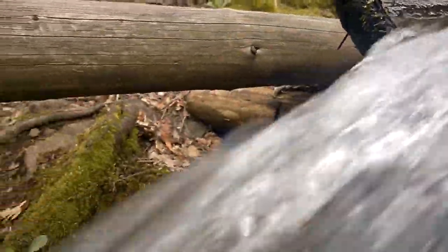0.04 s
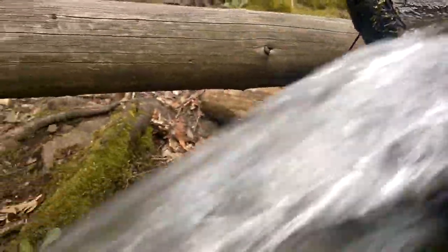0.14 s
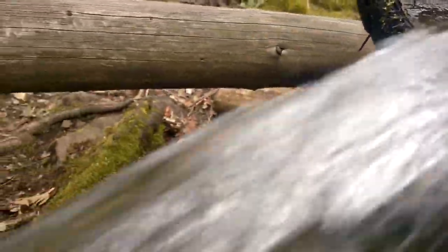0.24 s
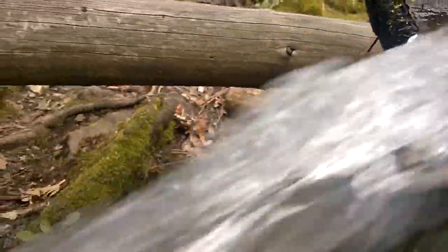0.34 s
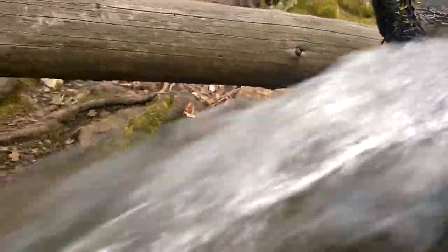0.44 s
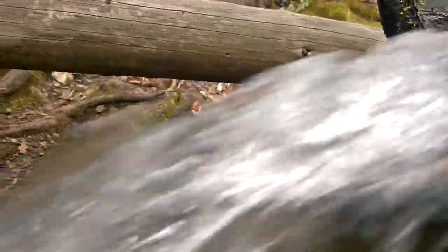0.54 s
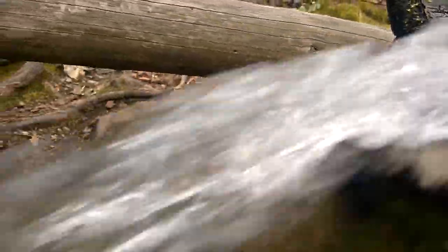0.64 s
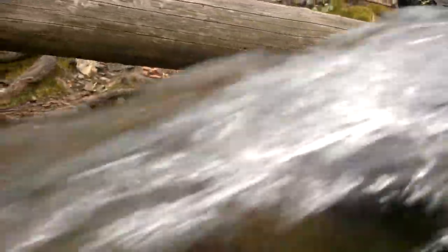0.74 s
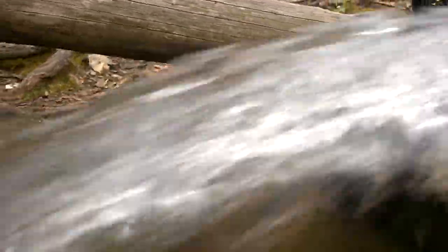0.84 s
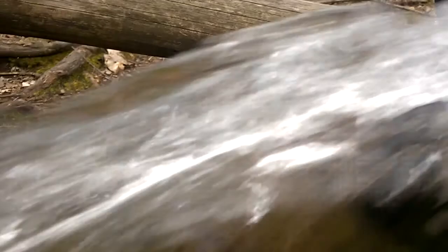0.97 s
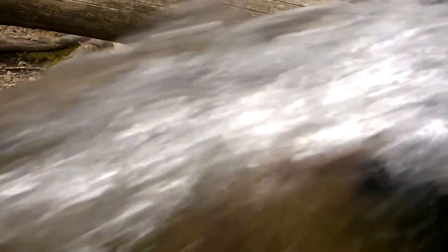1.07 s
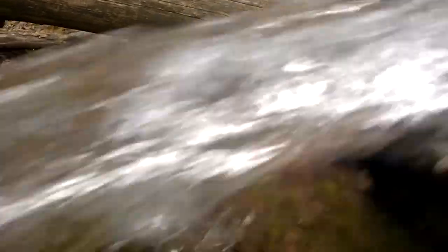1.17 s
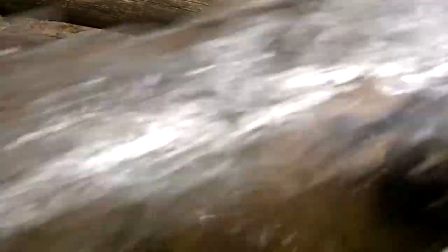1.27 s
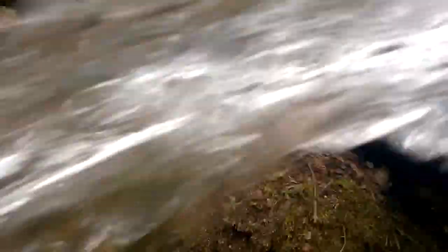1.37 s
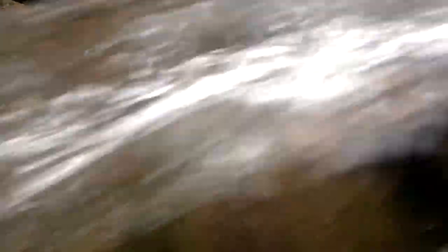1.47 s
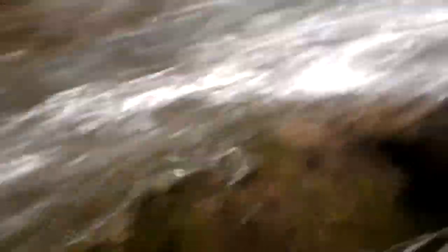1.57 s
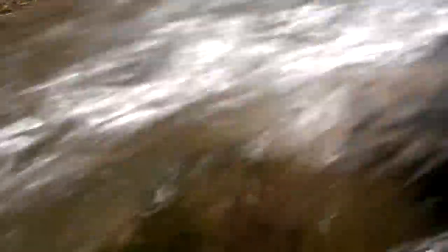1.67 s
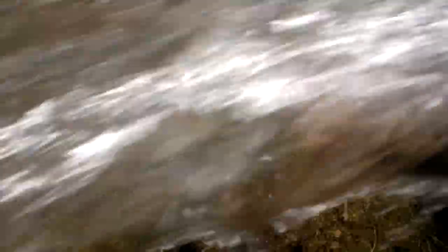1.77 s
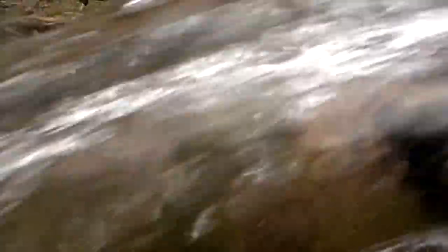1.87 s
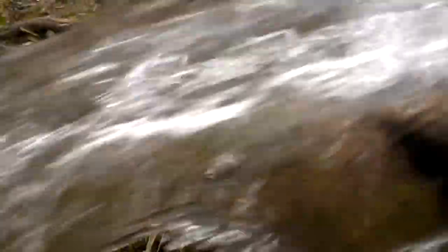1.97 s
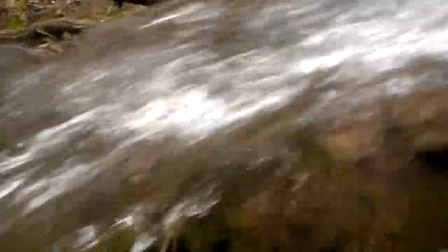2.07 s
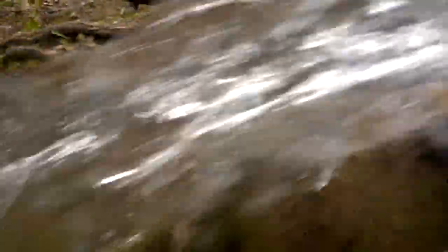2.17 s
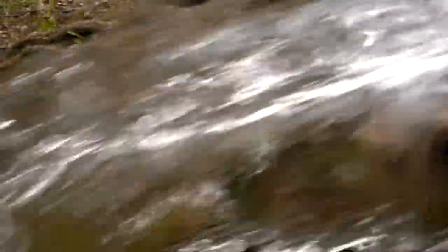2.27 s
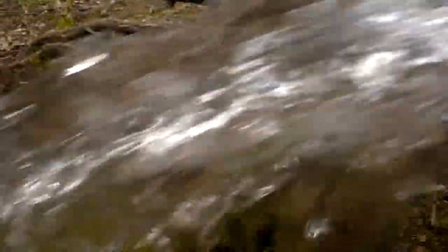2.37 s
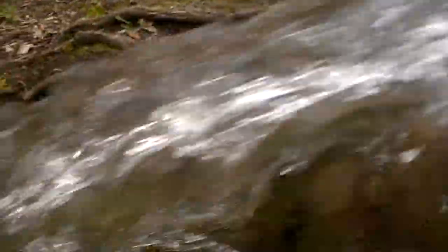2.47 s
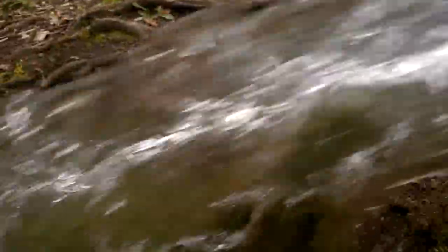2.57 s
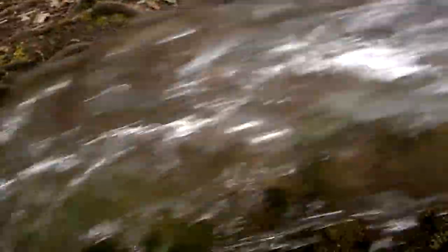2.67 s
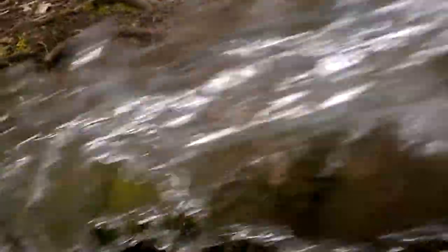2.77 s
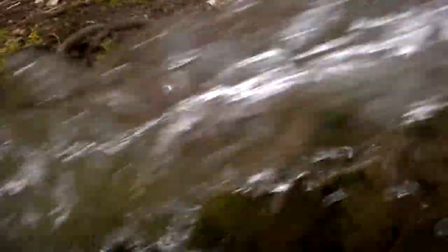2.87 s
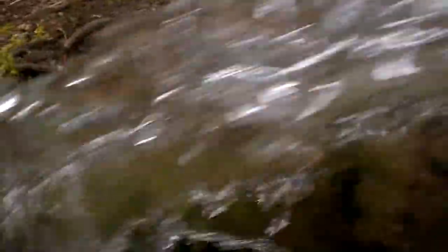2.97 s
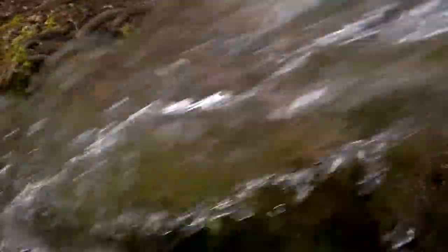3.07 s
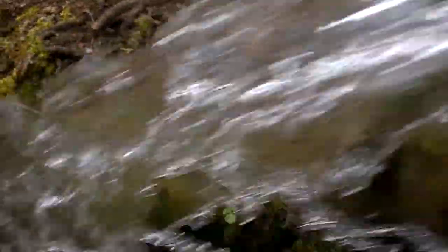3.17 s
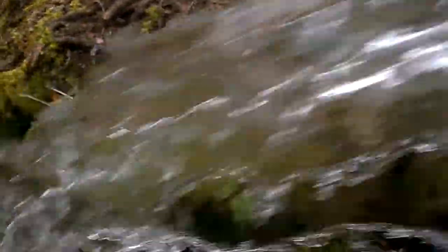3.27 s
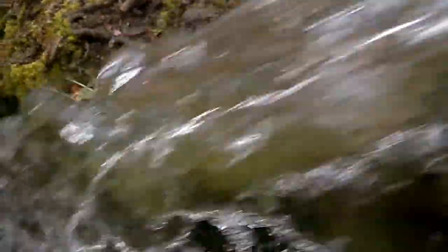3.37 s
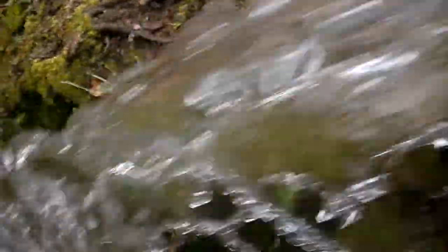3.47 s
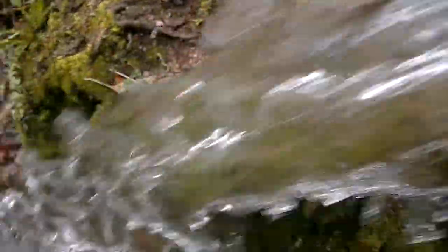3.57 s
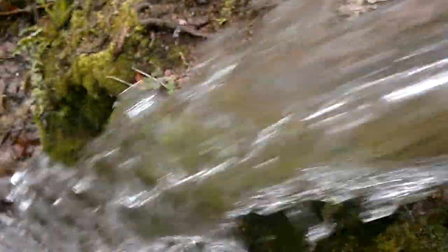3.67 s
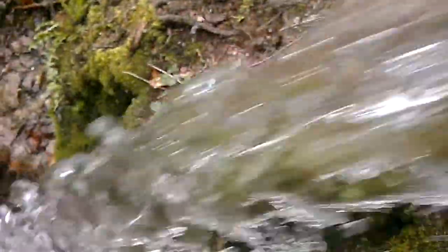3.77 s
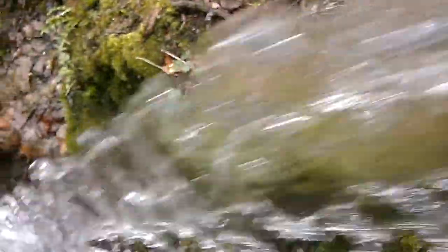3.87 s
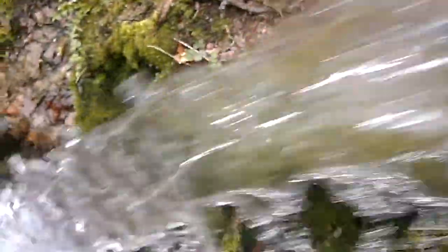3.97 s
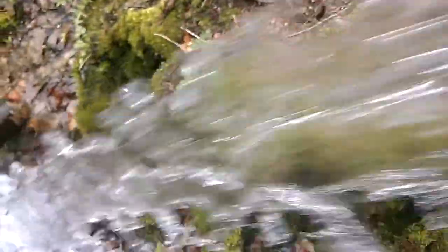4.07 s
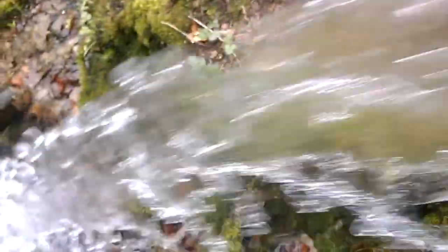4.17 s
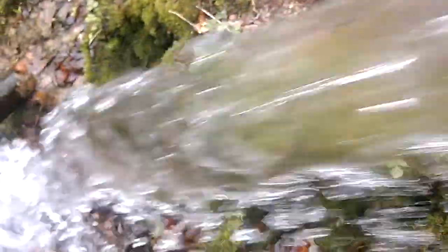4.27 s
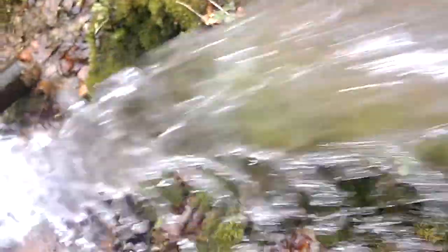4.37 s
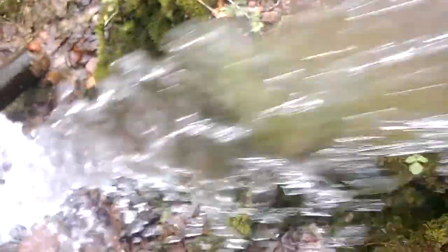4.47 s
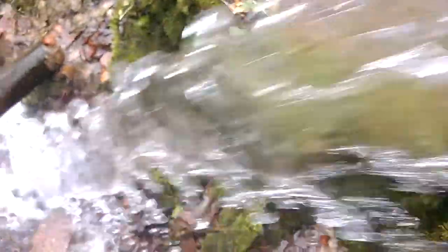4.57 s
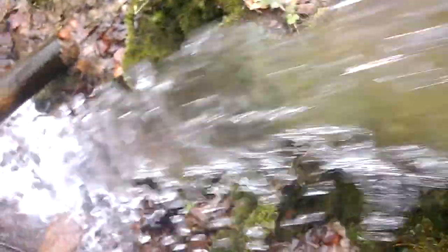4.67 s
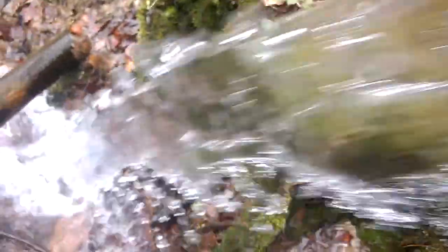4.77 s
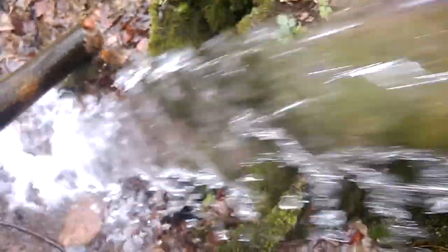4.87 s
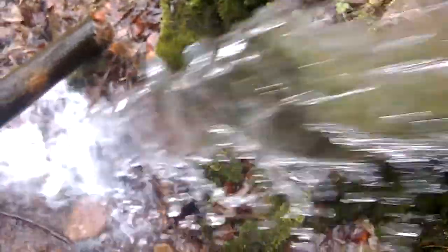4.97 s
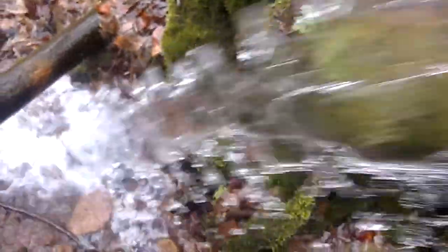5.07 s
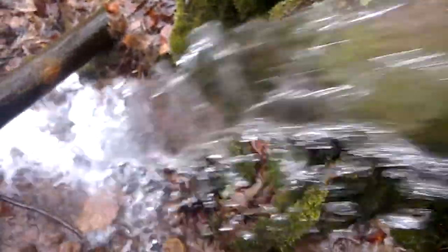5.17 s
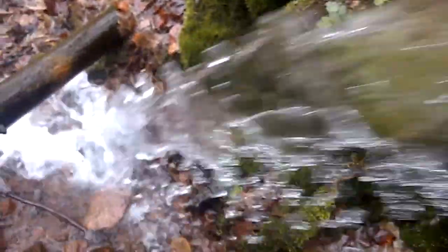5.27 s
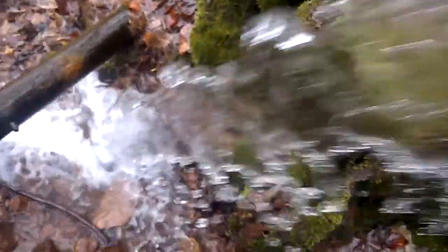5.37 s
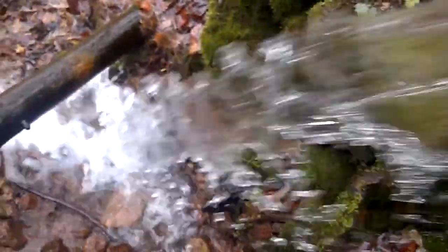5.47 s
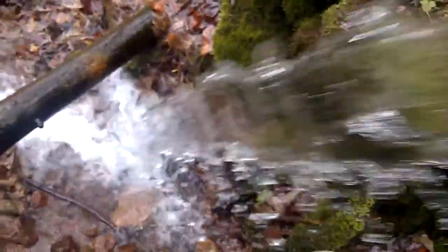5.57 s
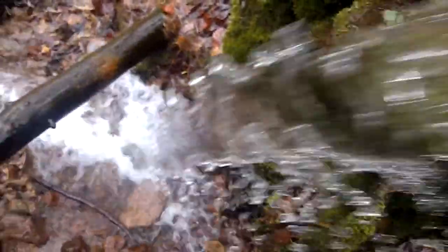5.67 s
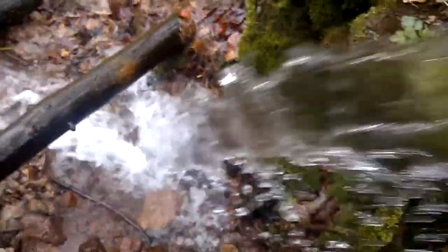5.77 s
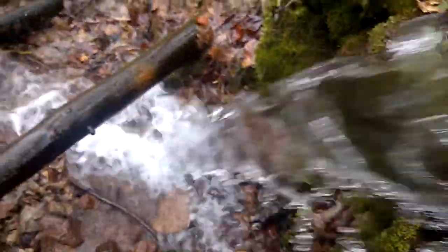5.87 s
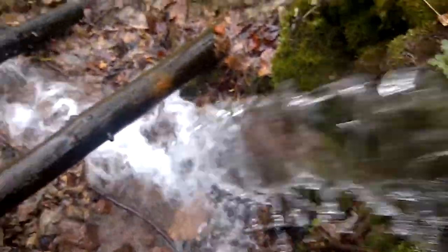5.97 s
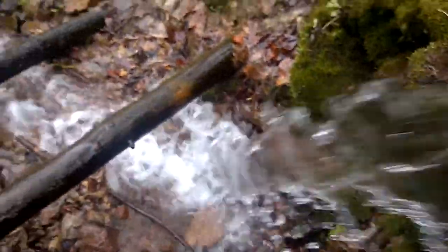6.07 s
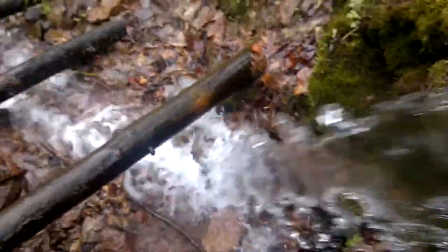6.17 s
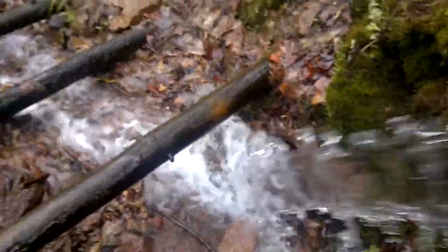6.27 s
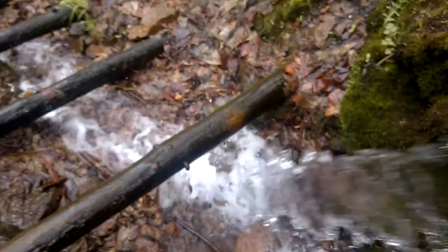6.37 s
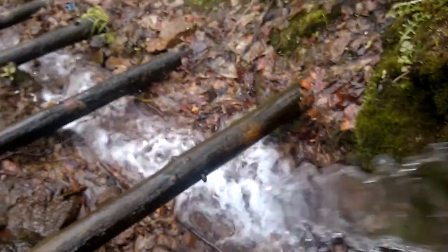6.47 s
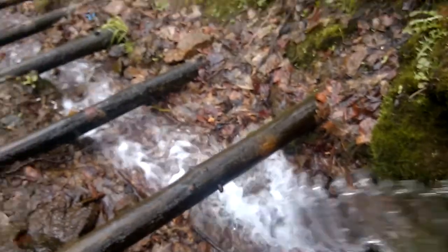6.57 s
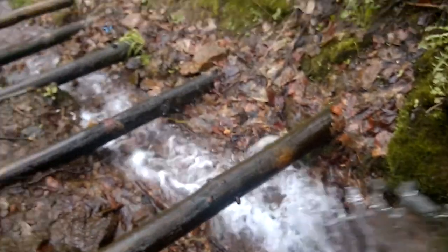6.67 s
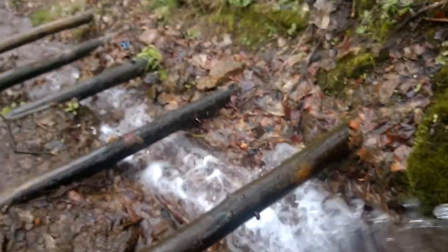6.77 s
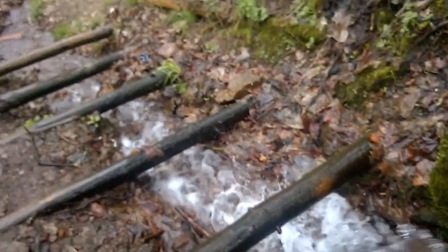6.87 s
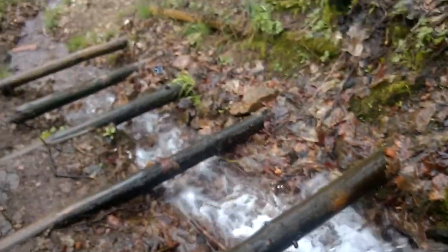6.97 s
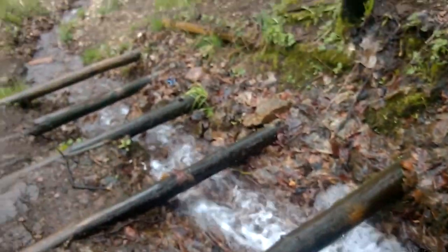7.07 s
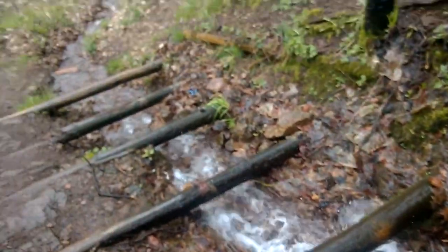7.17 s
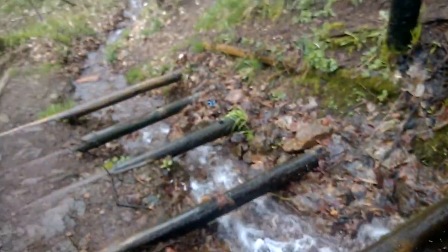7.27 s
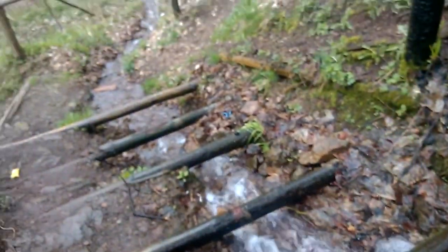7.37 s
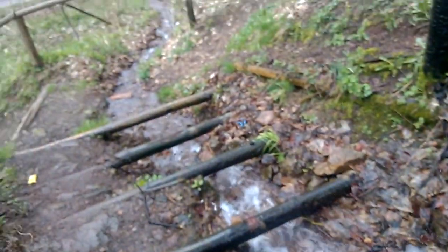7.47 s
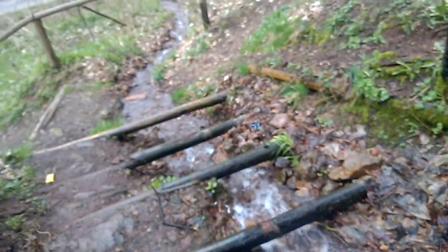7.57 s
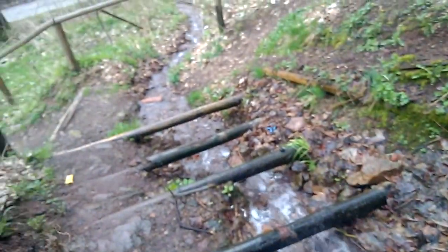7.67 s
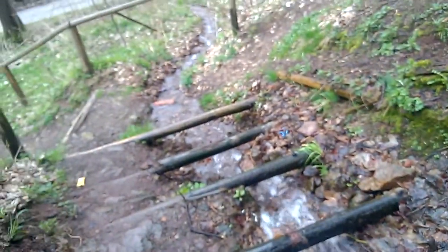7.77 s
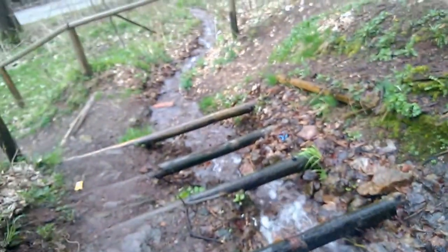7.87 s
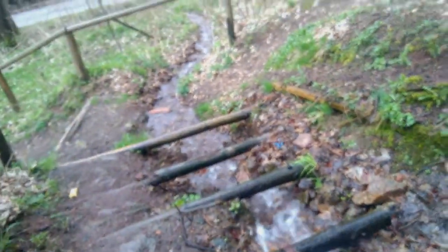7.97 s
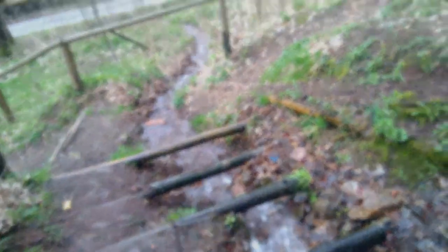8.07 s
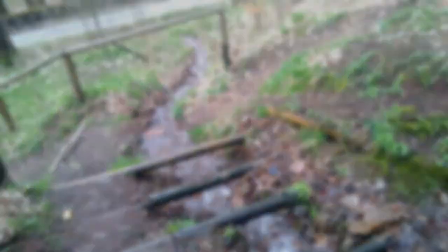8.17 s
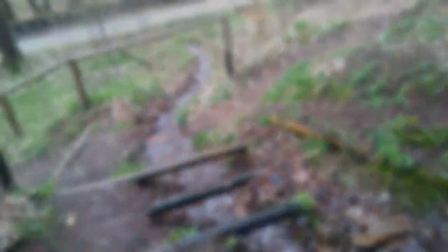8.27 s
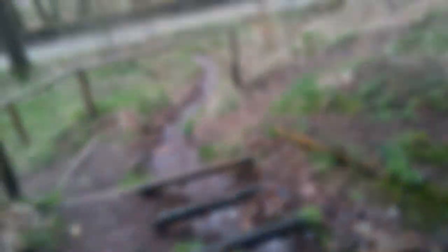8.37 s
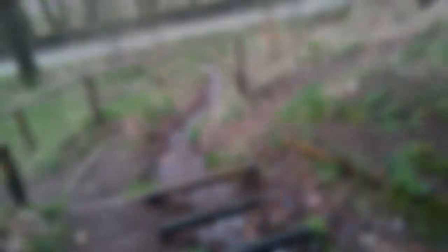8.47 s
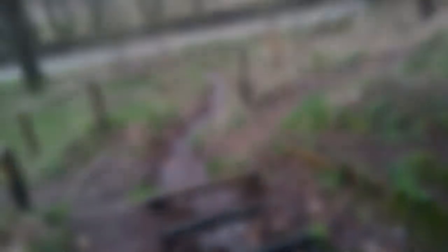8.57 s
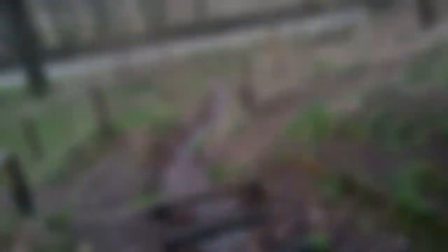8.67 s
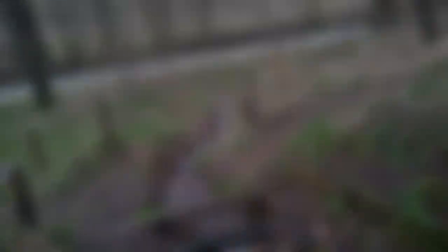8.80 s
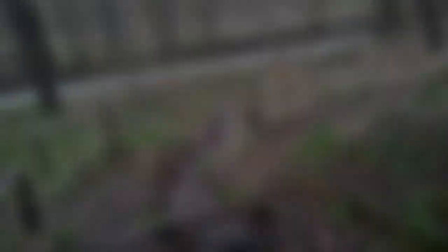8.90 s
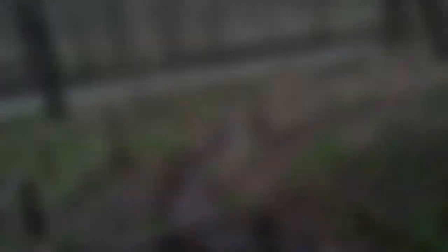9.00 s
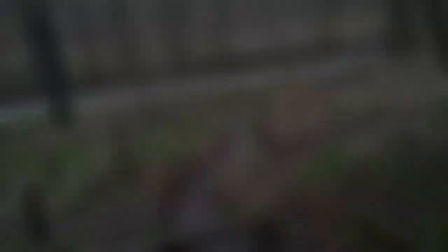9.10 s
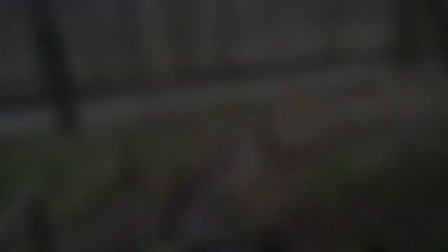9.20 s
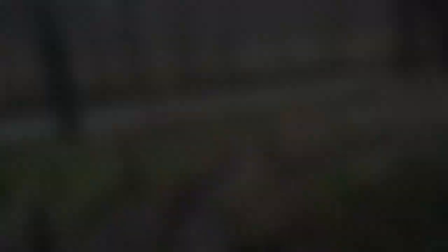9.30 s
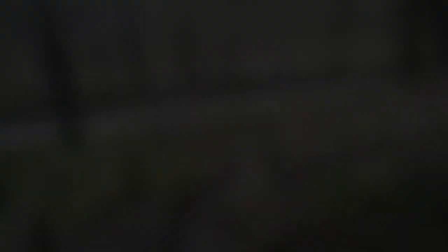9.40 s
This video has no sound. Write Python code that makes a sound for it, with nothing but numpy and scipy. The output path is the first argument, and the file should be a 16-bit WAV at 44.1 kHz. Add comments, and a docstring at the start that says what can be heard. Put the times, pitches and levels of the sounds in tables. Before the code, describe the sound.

Continuous rushing water, dense and noisy, with fine crackling drops and spray. Small gushes and slaps stand out, clustering around the middle, followed by many short, rising bubble plops. Soft low thuds and churning lie far beneath. The close handheld outdoor microphone moves from jet to pool to shallow run; the hiss shifts in colour, then the sound thins and fades to silence.

```python
"""Forest pipe falling into a stream

Water gushes from a pipe: splashes are noise bursts, bubbles are short rising sines, drops are clicks.
Slaps of water are hollow smacks with spray; single bubbles plop and glug; churn and soft thuds rumble below.
Colour and level follow a microphone from the jet down to the foaming pool, then away downstream to a fade."""
import sys
import numpy as np
from scipy import signal
from scipy.fft import rfft, irfft
from scipy.io import wavfile
from scipy.ndimage import uniform_filter1d

SR = 44100
rng = np.random.default_rng(int(sys.argv[2]) if len(sys.argv) > 2 else 0)


def output_pcm(signal):
    """Save a mono or channel-first signal as 16-bit PCM at the path in sys.argv[1].

    Samples are clipped to [-1, 1] before scaling.
    """
    pcm = np.clip(np.atleast_2d(signal).T, -1, 1) * 32767
    wavfile.write(sys.argv[1], SR, np.round(pcm).astype(np.int16))


N = 416294
TIME = np.arange(N) / SR  # s
BINS_HZ = np.fft.rfftfreq(N, 1 / SR)


def amp(db):
    """Decibels to gain."""
    return 10 ** (np.asarray(db) / 20)


def evened(x):
    """Scales to rms 1."""
    return x / np.sqrt(np.mean(x ** 2) + 1e-20)


def bell(x, centre, width):
    """A smooth bump of height 1."""
    return np.exp(-((x - centre) / width) ** 2)


def read(points, hz):
    """Reads a spectrum in dB on a log-frequency axis."""
    f, db = np.transpose(points)
    return np.interp(np.log(hz + 1), np.log(f + 1), db)


def read_columns(table, t):
    """Interpolates every column after the first at t, the first being time."""
    s, *columns = np.transpose(table)
    return [np.interp(t, s, column) for column in columns]


def add(mix, s, sound):
    """Mixes a sound in at time s."""
    part = mix[max(round(s * SR), 0):][:len(sound)]
    part += sound[:len(part)]


def noise(gain):
    """Noise of rms 1 with the given gain on each frequency."""
    return evened(irfft(rfft(rng.standard_normal(N)) * gain, N))


def burst(envelope, gain):
    """Noise under an envelope, then coloured by the given gain on each frequency."""
    return irfft(rfft(envelope * noise(1)) * evened(gain), N)


def wander(hz):
    """Random curve of rms 1 that swings about hz times a second."""
    return noise(BINS_HZ / (BINS_HZ + hz / 2) / (1 + (BINS_HZ / hz) ** 4))


def impacts(per_s, spread_db, cap):
    """Random clicks, their dB exponentially distributed up to cap spreads."""
    return (rng.random(N) < per_s / SR) * amp(spread_db * np.minimum(rng.exponential(1, N), cap))


def dying(x, seconds):
    """Gives every click an exponential tail of unit area."""
    r = np.exp(-1 / (seconds * SR))
    return signal.lfilter([1 - r], [1, -r], x)


def bubble(hz, cycles, rise=0.015, snap=2):
    """A trapped bubble swells for a few cycles and dies, its pitch rising as it nears the surface."""
    turns = np.arange(int(6 * cycles * SR / hz)) * hz / SR
    age = turns / cycles  # 1 at the peak
    swell = (age * np.exp(1 - age)) ** snap
    return swell * np.sin(2 * np.pi * turns * (1 + rise * age))


def splashes(surge, per_s=280, spread_db=2.0, cap=3.0, colour_db=4.5, spatter=0.98):
    """Each slug of water cracks, then spatters; it reaches all bands, each by its own amount."""
    crack_s, spatter_s = .0016, .012
    slugs = impacts(per_s, spread_db, cap) * surge
    at = np.flatnonzero(slugs)
    octaves = np.log2(np.geomspace(300, 14000, num=7))
    out = np.zeros(N)
    for pick in np.eye(len(octaves)):
        share = np.interp(np.log2(BINS_HZ + 1), octaves, pick)
        band_db = colour_db * np.clip(rng.standard_normal(N)[at], -2, 2)
        energy = np.zeros(N)
        energy[at] = (slugs[at] * amp(band_db)) ** 2
        power = dying(energy, crack_s) + spatter * dying(energy, spatter_s)
        out += np.sqrt(share.mean()) * evened(noise(np.sqrt(share)) * np.sqrt(power))
    return evened(out)


def foam(surge, per_s, spread_db, cycles, cap=3.04, top_hz=13000, count=44):
    """Bubbles of all sizes; the small, high ones are the most frequent."""
    out = np.zeros(N)
    for hz in np.geomspace(230, 15000, count):
        births = impacts(per_s * (hz / 1000) ** .6, spread_db, cap) * surge
        ring = bubble(hz * rng.uniform(0.99, 1.01), cycles * 2 ** rng.uniform(-1.1, 0.78))
        level = np.sqrt(hz / (1 + (hz / top_hz) ** 4))
        out += level * evened(signal.oaconvolve(births, ring)[:N])
    return evened(out)


def blips(per_s=200, spread_db=2.5, cap=5.1, cycles=5.2, low_hz=400, high_hz=5500):
    """Single bubbles at the calm edge of the pool ring longer; small ones last more cycles."""
    out = np.zeros(N)
    for when, size, pitch, length in rng.random((int(per_s * N / SR), 4)):
        hz = low_hz * (high_hz / low_hz) ** np.sqrt(pitch)
        db = spread_db * min(-np.log(1 - size), cap)
        ring = bubble(hz, cycles * np.sqrt(hz / 1000) * 2 ** (length - .5), rise=0.0047)
        add(out, when * N / SR, amp(db) * np.sqrt(hz) * ring)
    return evened(out)


def clusters(per_s=26, spread_db=1.9, life_s=0.005, cycles=2.55, low_hz=450, high_hz=5000, count=7):
    """A collapsing air pocket breaks into a handful of bubbles within milliseconds: a wet knock."""
    out = np.zeros(N)
    for row in rng.random((int(per_s * N / SR), count + 1, 2)):
        (when, size), bubbles = row[0], row[1:]
        db = spread_db * min(-np.log(1 - size), np.pi)
        for delay, pitch in bubbles:
            hz = low_hz * (high_hz / low_hz) ** pitch
            start_s = when * N / SR - life_s * np.log(1 - delay)
            add(out, start_s, amp(db) * hz * bubble(hz, cycles))
    return evened(out)


def drops(per_s=130, spread_db=-1.0, cap=4.7):
    """Flung drops tick on wet stone and leaves, each a single sharp click."""
    return evened(impacts(per_s, spread_db, cap) * rng.choice([-1, 1], N))


def steady(x):
    """The pipe gives a constant flow, so a burst of splashes is followed by a lull."""
    power = uniform_filter1d(x ** 2, int(.075 * SR))
    return evened(x / np.sqrt(abs(power) + 1e-12))


def pockets(x, depth_db=1.5, width_hz=80, life_s=0.12, top_hz=2600):
    """Air pockets form and collapse under the fall: narrow, mostly low bands lift and sink for a moment."""
    hz, t, z = signal.stft(x, SR, nperseg=2048, noverlap=1536)
    patches = rng.standard_normal((len(t), len(hz))).T
    for axis, steps in enumerate([width_hz / hz[1], life_s / t[1]]):
        kernel = np.exp(-(2 * np.arange(-40, 41) / steps) ** 2)
        patches = signal.fftconvolve(patches, np.expand_dims(kernel, 1 - axis), "same", axes=axis)
    lift_db = depth_db * evened(patches) / (1 + (hz[:, None] / top_hz) ** 2)
    return signal.istft(z * amp(lift_db), SR, nperseg=2048, noverlap=1536)[1][:N]


# Heavier gushes from the pipe. Each row: centre in seconds, swell in dB.
GUSHES = [(0.022, 3.5), (0.11, 2), (0.305, 1.5), (1.04, 0), (1.08, 2), (2.81, 2), (3.56, -0.5), (4.84, 1),
          (6.49, 2), (7.18, 0.5), (8.419, 1.5)]
GUSH_HALF_S = 0.036


def heavier(x, top_hz=5000):
    """Heavy gushes swell the gurgle and splash, but hardly the fine spray."""
    swell = amp(sum(db * bell(TIME, s, GUSH_HALF_S) for s, db in GUSHES)) - 1
    return x + swell * irfft(rfft(x) / (1 + (BINS_HZ / top_hz) ** 4), N)


LULL_DEPTH, LULL_LEAD_S, LULL_HALF_S = 0.28, 0.0065, 0.0033  # depth 0-1


def parted(x):
    """The jet parts for an instant just before each near slug lands: a brief dip in level."""
    gaps = sum(bell(TIME, s - LULL_LEAD_S, LULL_HALF_S) for s, *_ in SLAPS)
    return x * (1 - LULL_DEPTH * np.minimum(gaps, 1))


# Path of the microphone. Each row: time in seconds, splash in relative dB, gurgle in relative dB,
# place (0 jet, 1 fall, 2 pool, 3 riffle, 4 stream), first notch of a close reflection in Hz.
PATH = [(0, -32.5, -45.5, 0.24, 4870), (1.8, -30, -45, 0.41, 5300), (2.85, -28, -43, 0.75, 6300),
        (3.8, -26.5, -42, 1, 5200), (4.4, -28, -42, 1.41, 4580), (5.2, -29.5, -39.5, 1.74, 4110),
        (6.0, -31, -40, 2, 3800), (6.9, -31.7, -41.5, 2.42, 3830), (7.7, -33.5, -43.5, 3.17, 4350),
        (8.701, -38, -48.5, 4, 4700)]


def on_path(t):
    """Loudness of splash and gurgle, place and notch of the microphone at times t."""
    loud_db, gurgle_db, place, notch_hz = read_columns(PATH, t)
    return loud_db, gurgle_db, np.clip(place, 0, len(PLACES) - 1), notch_hz


def gurgle_level():
    """Loudness of the low gurgle along the path, sample by sample."""
    return on_path(TIME)[1]


# Balance at jet, fall, pool, riffle, stream. Each row: spray over splash in dB, reflection strength 0-1.
PLACES = [(-2.5, 0.45), (-1.56, 0.62), (-0.1, 0.5), (-1.5, 0.11), (-1.9, 0.17)]


def balance_at(place):
    """Spray and reflection blend between neighbouring places."""
    return [np.interp(place, np.arange(len(PLACES)), c) for c in np.transpose(PLACES)]


# Colour of the water at each place; the riffle is the shallow run under the logs.
# Each row: frequency in Hz, relative level per Hz in dB.
JET = [(180,-20), (280,-11), (480,-4), (580,-15.5), (900,-11), (1450,-2.5), (2400,-3), (3900,1),
       (4900,-6.5), (6200,-0.5), (8200,-7.5), (10700,-11.5), (13300,-4), (16000,-4.5)]
FALL = [(180, -25.5), (280, -12.5), (400, -9.5), (560, -19), (900, -10), (1600, -6.5), (2300, -5.5),
        (3300, -2), (4300, -1.5), (5700, 4), (7000, -3.5), (9000, -9), (11000, -18), (13500, -11.5),
        (16000, -10.5)]
POOL = [(180,-20.5), (280,-8.5), (470,-10), (570,-7), (900,-5.5), (1700,1.7), (2500,-1.5), (3100,-2.6),
        (3900,-4), (5000,0.5), (6900,-4.5), (9500,-7.5), (10700,-3), (13300,-4.5), (16000,-12)]
RIFFLE = [(110, -30), (180, -18), (271, -12.5), (339, -18.5), (561, -12.5), (676, -15), (894, -4),
          (1180, -8), (1590, -1.5), (2790, -3.5), (3760, -11), (5460, -13), (8540, -13), (15500, -22.5)]
STREAM = [(180,-27), (280,-6.5), (560,-11.5), (950,-1), (1200,-4), (1600,-0.5), (2300,-8.5), (3100,-10.5),
          (4400,-4.5), (5800,-12.5), (8800,-10.5), (11500,-15), (13700,-18), (16000,-9)]


def place_db(hz, place):
    """Spectra of neighbouring places blend in dB."""
    views = [JET, FALL, POOL, RIFFLE, STREAM]
    return sum(np.outer(read(view, hz), np.maximum(1 - abs(place - k), 0)) for k, view in enumerate(views))


# Peaks and dips of the microphone housing. Each row: centre in Hz, width in Hz, gain in dB.
HOUSING = [(380, 40, 3.5), (430, 22, 1.5), (593, 140, 3), (2004, 180, 1.7), (5120, 130, 2.5),
           (5490, 770, -5), (12100, 1350, 3.5)]


def housing_db(hz):
    """The microphone housing adds fixed peaks and dips."""
    return sum(db * bell(hz, f, width) for f, width, db in HOUSING)[:, None]


# Resonances and dips of the rocky hollow under the fall. Each row: centre in Hz before the pitch factor,
# width in Hz, gain in dB when fully heard.
HOLLOW = [(376, 30, 1), (557, 55, 6), (700, 45, 3), (780, 39, -7), (1060, 35, -3), (1620, 54, -4),
          (1850, 50, 0)]
# Passing the hollow. Each row: time in seconds, how strongly it is heard 0-1, pitch factor.
PASSING = [(2.6, 0.2, 0.95), (3.7, 1, 1.01), (4.4, 1, 1.03), (5.4, 1, 1.014), (6.0, 0, 0.99),
           (6.6, 0, 0.92)]


def hollow_db(hz, t):
    """The hollow colours the gurgle while the microphone passes it, its pitch drifting a little."""
    near, pitch = read_columns(PASSING, t)
    return near * sum(db * bell(hz[:, None], f * pitch, width) for f, width, db in HOLLOW)


# Bands of the hiss that slide as the microphone turns. Each row: time in seconds,
# bright band in Hz, its gain in dB, upper band in Hz, its gain in dB, top band in Hz, its gain in dB.
SWEEP = [(0.2, 6760, -2, 11300, 3, 14500, 10), (1.2, 7000, -0.5, 11500, -3.5, 14700, 1),
         (2.3, 7900, 2, 12100, -5, 14300, -3), (3.2, 8700, -1.5, 15300, 4, 15030, -1),
         (4.2, 8700, 2.5, 14300, 9, 15500, 1), (4.6, 7900, 1.5, 12700, 4, 14500, 8),
         (5.15, 6950, 1, 11800, -1, 13000, 8), (5.9, 6840, 2, 11800, 0, 12700, -2),
         (6.8, 6900, 1, 12200, -5, 13400, -2), (7.3, 7570, 2, 12400, -5.5, 14000, 3),
         (8.0, 7600, -0.5, 12600, 3, 13700, 6), (9.2, 8900, 3, 13800, -3, 14700, -2)]
BRIGHT_WIDTH_HZ, UPPER_WIDTH_HZ, TOP_WIDTH_HZ = 460, 490, 720
BRIGHT_EDGE = 1.24  # centre of the opposite bump over the bright band's centre


def sweep_db(hz, t):
    """A bright band paired with an opposite bump above it and two higher peaks or dips glide in the hiss."""
    bright_hz, bright_db, upper_hz, upper_db, top_hz, top_db = read_columns(SWEEP, t)
    f = hz[:, None]
    bright = bell(f, bright_hz, BRIGHT_WIDTH_HZ) - bell(f, BRIGHT_EDGE * bright_hz, BRIGHT_WIDTH_HZ)
    upper = upper_db * bell(f, upper_hz, UPPER_WIDTH_HZ)
    top = top_db * bell(f, top_hz, TOP_WIDTH_HZ)
    return bright_db * bright + upper + top


def comb_db(hz, notch_hz, strength):
    """A reflection weakens odd multiples of its first notch."""
    delayed = np.exp(1j * np.pi * hz[:, None] / notch_hz)
    return 20 * np.log10(abs(1 + np.clip(strength, 0, .9) * delayed))


# Reflection from the ground by the pool. Each row: time in seconds, first notch in Hz, strength 0-1.
GROUND = [(4.4, 400, 0.45), (5.9, 430, 0.23), (6.5, 460, 0.1), (6.95, 620, 0.38), (7.35, 760, 0.1),
          (7.8, 900, 0.04)]
GROUND_TOP_HZ = 1360  # the leaf litter soaks up the treble above


def ground_db(hz, t):
    """A low ground reflection, its notch rising as the microphone turns."""
    notch_hz, strength = read_columns(GROUND, t)
    return comb_db(hz, notch_hz, np.outer(1 / (1 + (hz / GROUND_TOP_HZ) ** 4), strength))


# Edges of the gurgle, splash and spray bands in Hz.
FLOW_EDGES_HZ = [250, 1200, 4500, 16000]


def heard_on_path(x):
    """Colour and loudness of the water change as the microphone moves along its path."""
    hz, t, z = signal.stft(x, SR, nperseg=2048, noverlap=1024)
    loud_db, gurgle_db, place, notch_hz = on_path(t)
    spray_db, echo = balance_at(place)
    colour_db = place_db(hz, place) + housing_db(hz) + hollow_db(hz, t) + sweep_db(hz, t)
    colour_db += comb_db(hz, notch_hz, echo) + ground_db(hz, t)
    # lift each band from its coloured level to the path's level
    levels = [gurgle_db, loud_db, loud_db + spray_db]
    centres = np.sqrt(np.multiply(FLOW_EDGES_HZ[:-1], FLOW_EDGES_HZ[1:]))
    lift_db = 0
    for k, level_db in enumerate(levels):
        band = (hz >= FLOW_EDGES_HZ[k]) & (hz < FLOW_EDGES_HZ[k + 1])
        band_db = 10 * np.log10((amp(colour_db[band]) ** 2).sum(0) / len(hz))
        share = np.interp(np.log(hz + 1), np.log(centres), np.arange(len(levels)) == k)
        lift_db = lift_db + np.outer(share, level_db - band_db)
    return signal.istft(z * amp(colour_db + lift_db), SR, nperseg=2048, noverlap=1024)[1][:N]


def gush(surge_db=0.5, surge_hz=32, foam_db=-5, blips_db=-15, knocks_db=-14.5, drops_db=-13,
         wash_db=-9.5, level_db=-1.84):
    """Splashes and foam surge together, among bubbles and drops, over the smooth wash of the stream."""
    surge = amp(surge_db * wander(surge_hz))
    water = splashes(surge)
    water += amp(foam_db) * foam(surge, per_s=50, spread_db=2.5, cycles=2.94)
    water += amp(blips_db) * blips() + amp(knocks_db) * clusters()
    water += amp(drops_db) * drops() + amp(wash_db) * noise(1)
    flow = parted(heavier(pockets(steady(water))))
    return amp(level_db) * heard_on_path(flow)


# Deep churning of the pool. Each row: frequency in Hz, relative level per Hz in dB.
CHURN = [(12, -37), (20, -48), (59, -2.5), (119, -6), (200, 3.5), (260, -34), (440, -120)]
CHURN_DB = -68.5


def rumble(lumps_db=4.5, lumps_hz=12, follow=.04):
    """The pool churns under the gurgle and swells slightly with it."""
    gurgle_db = gurgle_level()
    churn = noise(amp(read(CHURN, BINS_HZ)) / (1 + (BINS_HZ / 210) ** 8))
    swell_db = follow * (gurgle_db - np.median(gurgle_db)) + lumps_db * wander(lumps_hz)
    return churn * amp(CHURN_DB + swell_db)


# Soft low thuds. Each row: centre in seconds, rms at the centre in dB.
THUDS = [(0.056, -50), (2.46, -49), (3.057, -50), (4.511, -46), (7.18, -60)]
THUD_HALF_S = 0.024


def thuds(low_hz=110, top_hz=400):
    """Soft low thuds, each a smooth swell of rumble."""
    swell = sum(amp(db) * bell(TIME, at, THUD_HALF_S) for at, db in THUDS)
    return swell * noise(BINS_HZ / (BINS_HZ + low_hz) / (1 + (BINS_HZ / top_hz) ** 4))


# Large single bubbles. Each row: start in seconds, peak in dB, starting pitch in Hz, cycles to the peak.
PLOPS = [(0.112, -20, 2200, 2.2), (0.299, -16, 2100, 2.2), (2.178, -17, 2330, 1.6), (2.645, -37.5, 340, 2),
         (2.81, -23, 2050, 7), (3.742, -23.5, 950, 2.2), (4.036, -29.5, 700, 2.9),
         (4.603, -14.5, 2430, 2.3), (4.711, -18, 1660, 2), (4.814, -19.5, 1840, 2), (4.835, -16, 1630, 3.1),
         (5.025, -12, 2230, 1.6), (5.122, -13, 2190, 2.1), (5.315, -21, 1810, 3.5), (5.481, -25, 1830, 2.4),
         (5.912, -16, 1850, 2.2), (6.280, -24, 745, 1.4), (6.321, -21, 1900, 2.1),
         (6.371, -17.5, 1670, 2.8), (6.44, -25.5, 890, 2.7), (6.643, -25.5, 750, 2.6),
         (6.7878, -17, 1620, 2.8), (6.885, -22, 1350, 1.4), (6.977, -20, 1680, 3), (6.9895, -18, 1460, 2.6),
         (7.125, -13.5, 1700, 1.3), (7.3821, -11, 1620, 2.7), (7.609, -18, 1900, 1.3),
         (7.70, -30, 580, 2.3), (7.874, -29.5, 626, 1.8), (7.922, -25, 1610, 4.8), (8.123, -16, 2050, 4.9),
         (8.149, -26, 1550, 2.8), (9.0865, -32, 1540, 2.4)]


def plops(snap=4.7, spit_db=-17, spit_s=0.0045, spit_hz=2600):
    """Large bubbles, each starting with a short spit of spray."""
    out, spit = np.zeros(N), np.zeros(N)
    for s, db, hz, cycles in PLOPS:
        add(out, s, amp(db) * bubble(hz, cycles, snap=snap))
        add(spit, s, amp(db + spit_db) * np.exp(-TIME[:SR // 20] / spit_s))
    ratio = BINS_HZ / spit_hz
    return out + burst(spit, ratio / (1 + ratio ** 2))


def glugs(per_s=2, low_hz=300, high_hz=1200, cycles=3.5, over_db=6.5, range_db=7):
    """Deeper bubbles break at random, their level tied to the gurgle; the deepest tend to be softest."""
    out, gurgle_db = np.zeros(N), gurgle_level()
    for when, size, pitch in rng.random((int(per_s * N / SR), 3)):
        hz = low_hz * (high_hz / low_hz) ** pitch
        db = gurgle_db[int(when * N)] + over_db - range_db * size
        add(out, when * N / SR, amp(db) * np.sqrt(hz / 1000) * bubble(hz, cycles))
    return out


# Near slaps of water on stone. Each row: start in seconds, smack onset in dB, spray onset in dB.
SLAPS = [(1.032, -22.5, -25), (1.787, -19, -28), (1.859, -26, -23), (1.987, -23, -36), (2.16, -31, -28),
         (3.015, -22, -25), (3.135, -28, -23), (3.531, -22, -22), (3.859, -35, -19), (3.902, -28, -18),
         (4.038, -24, -20), (4.156, -24, -19.5), (4.209, -26, -19), (4.298, -35, -19), (4.311, -22.5, -24),
         (4.338, -30, -21), (4.71, -30, -25), (5.364, -40, -26), (5.601, -29, -23), (6.1, -29, -21),
         (6.734, -37, -22), (6.932, -28, -22.5), (7.058, -26, -32), (7.349, -36, -26), (7.988, -30, -30),
         (8.313, -40, -29)]


def slaps(smack_hz=2400, spray_hz=7800, spatter=0.24, spatter_s=0.01):
    """Near slugs of water hit stone: a hollow smack and a short hiss of spray, trailing off in spatter."""
    smack_s, spray_s = .0038, .0022
    smack, spray, t = np.zeros(N), np.zeros(N), TIME[:SR // 20]
    tail = spatter * np.exp(-t / spatter_s)
    for s, smack_db, spray_db in SLAPS:
        add(smack, s, amp(smack_db) * ((1 - spatter) * np.exp(-t / smack_s) + tail))
        add(spray, s, amp(spray_db) * ((1 - spatter) * np.exp(-t / spray_s) + tail))
    low, high = BINS_HZ / smack_hz, BINS_HZ / spray_hz
    return burst(smack, low ** 2 / (1 + low ** 5)) + burst(spray, high ** 2 / (1 + high ** 6))


def scene():
    """All the water at one microphone."""
    return (gush() + rumble() + thuds() + plops() + glugs() + slaps())[None]


FADE_START_S, SILENT_S = 8.63, 9.553
EDGE_HZ = 15800


def record(dry):
    """The closing fade, a straight line in amplitude, then the recorder's band limit."""
    faded = dry * np.clip((SILENT_S - TIME) / (SILENT_S - FADE_START_S), 0, 1)
    lowpass = signal.firwin(511, EDGE_HZ, window=("kaiser", 9), fs=SR)
    return signal.oaconvolve(faded, lowpass[None], "same")


dry = scene()
out = record(dry)
output_pcm(out)
```